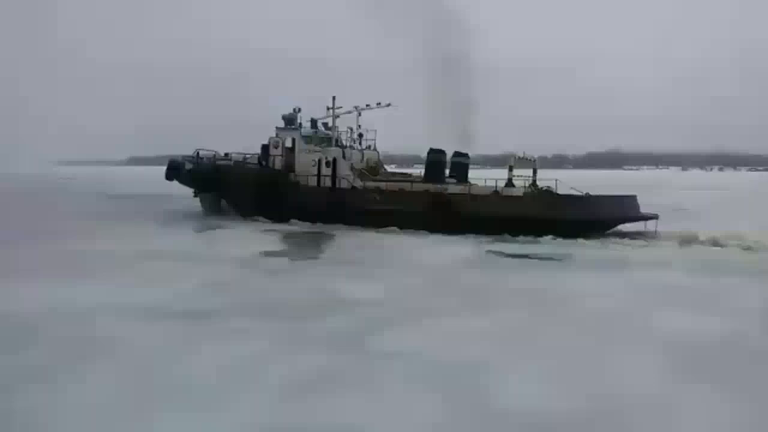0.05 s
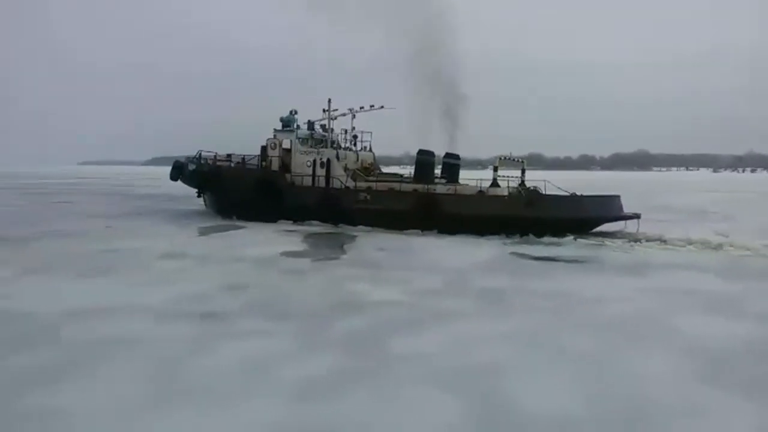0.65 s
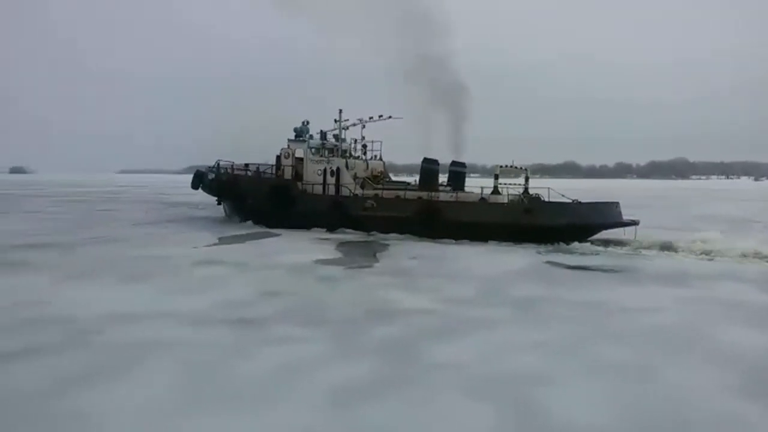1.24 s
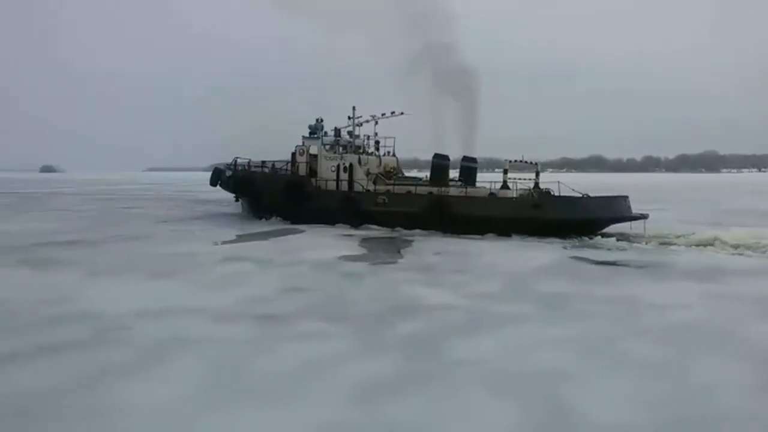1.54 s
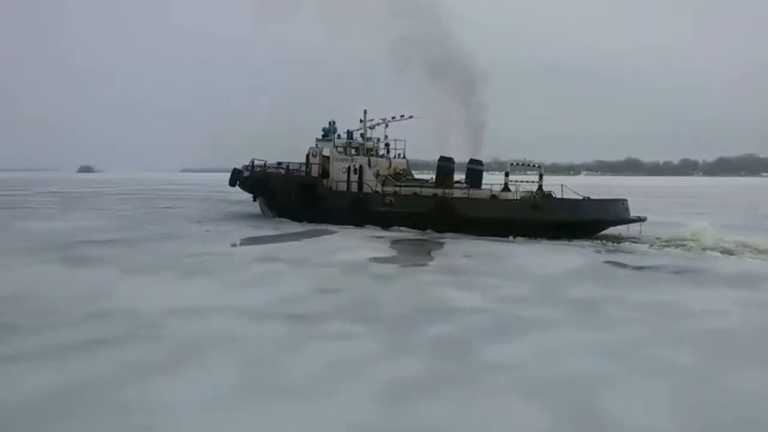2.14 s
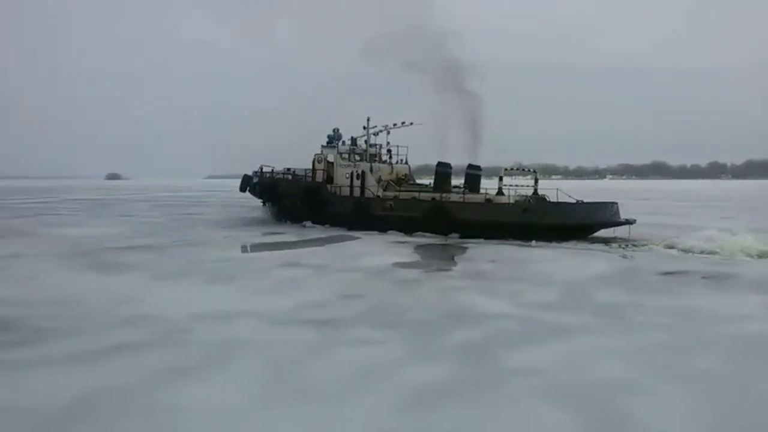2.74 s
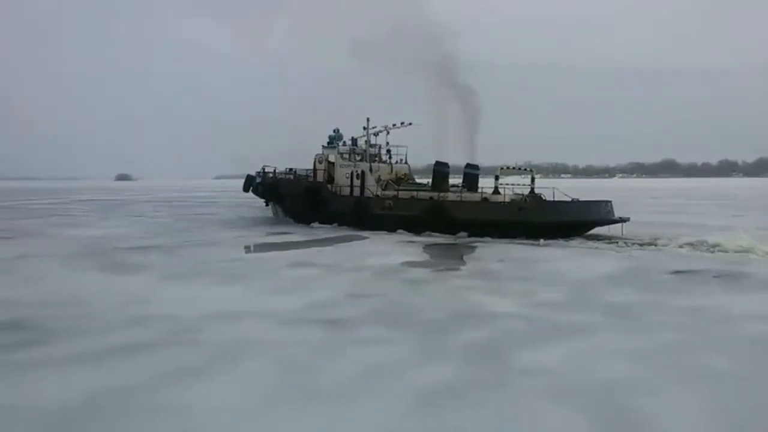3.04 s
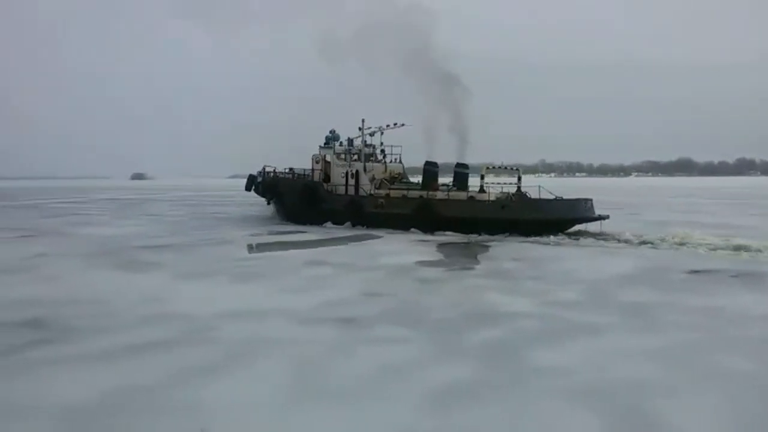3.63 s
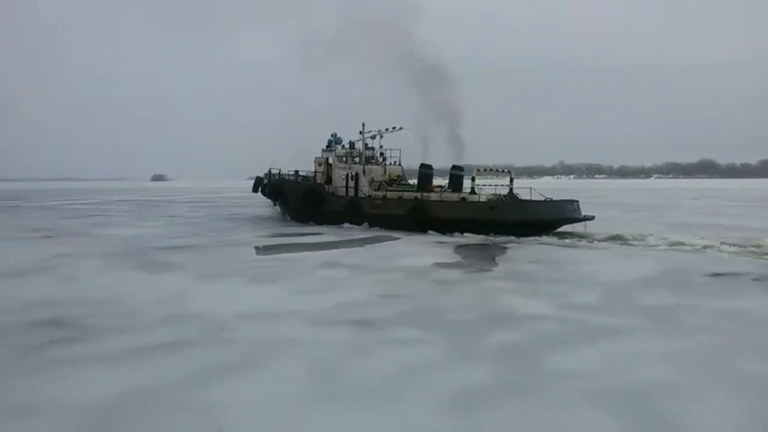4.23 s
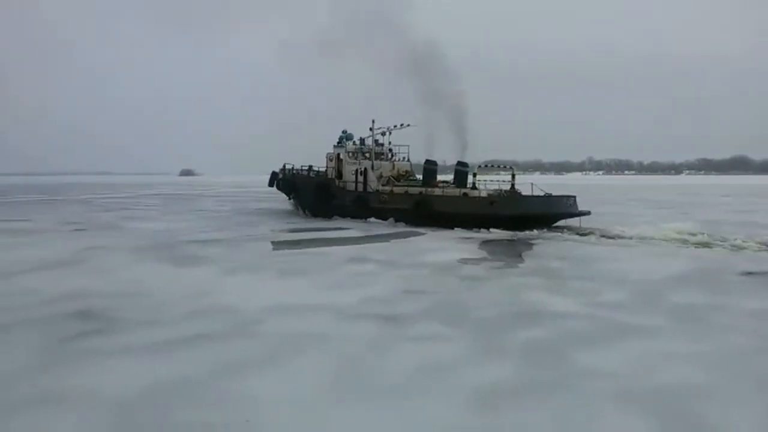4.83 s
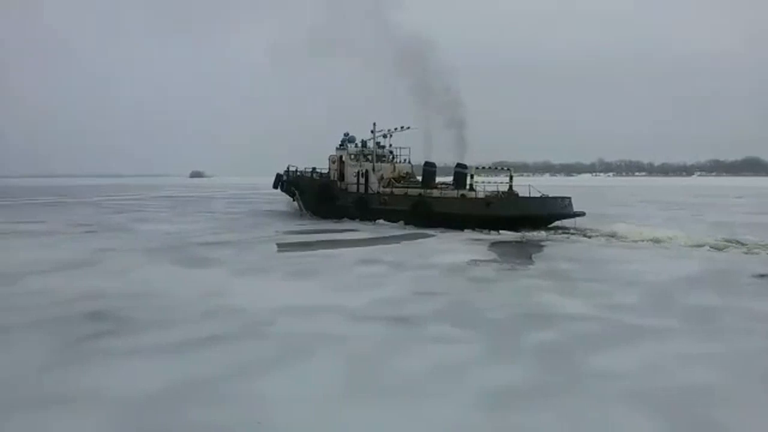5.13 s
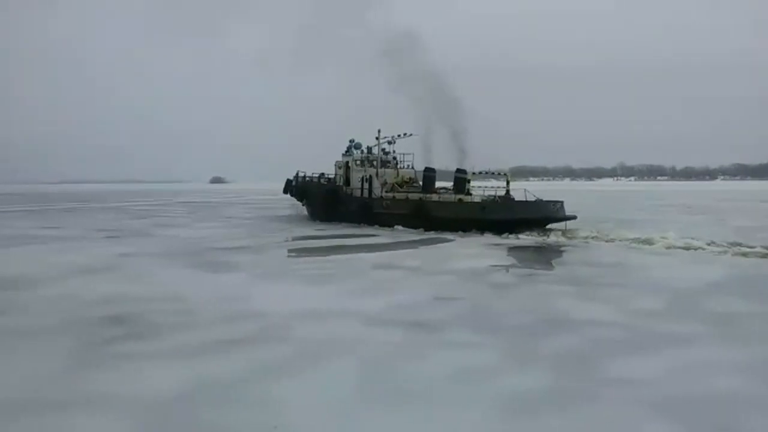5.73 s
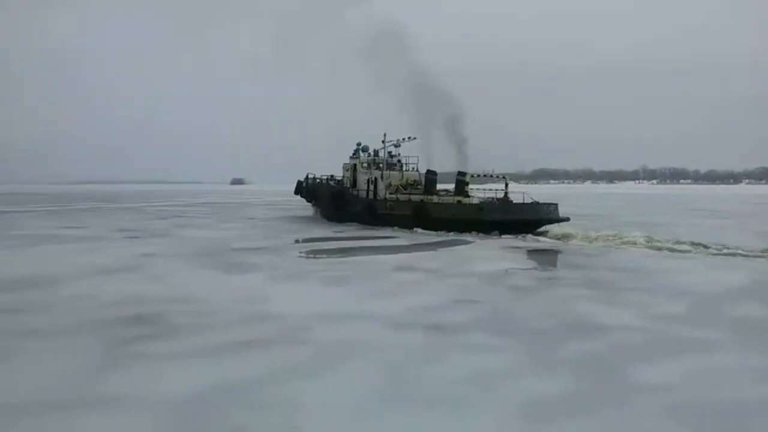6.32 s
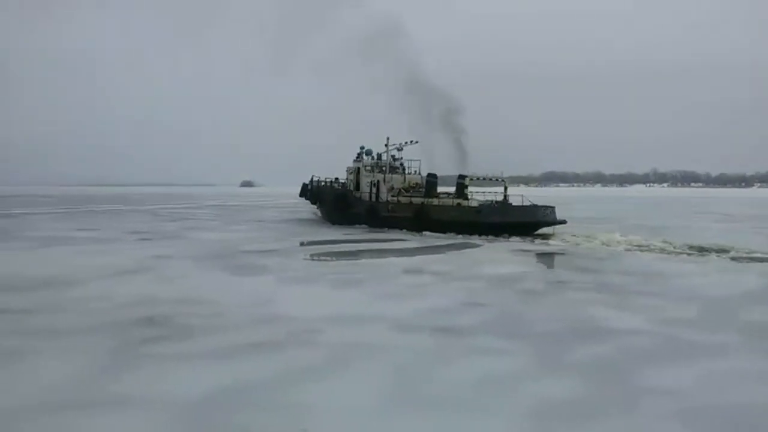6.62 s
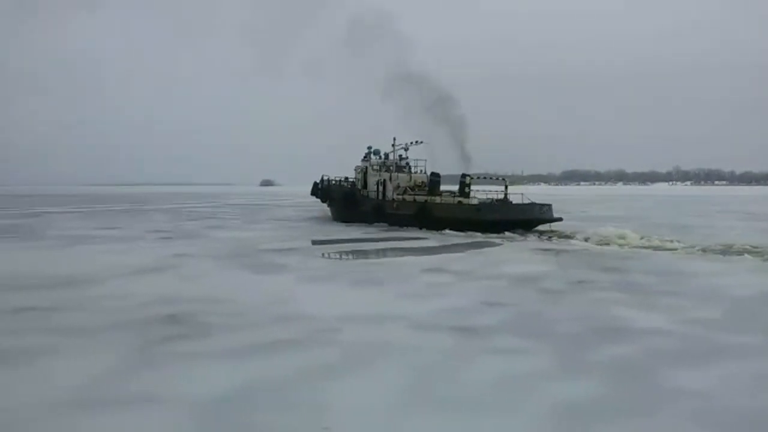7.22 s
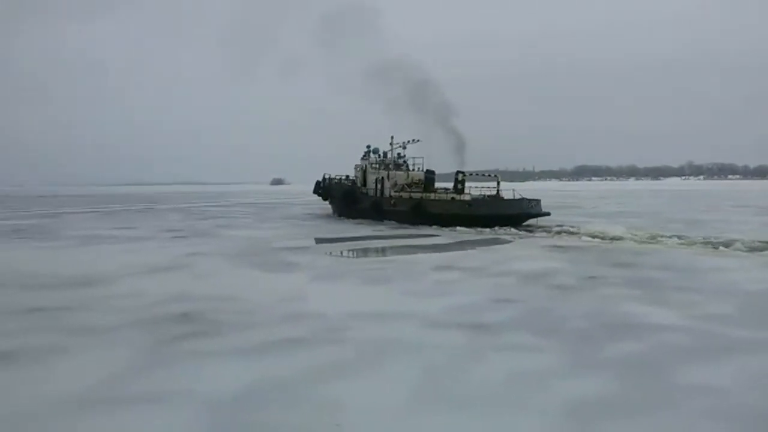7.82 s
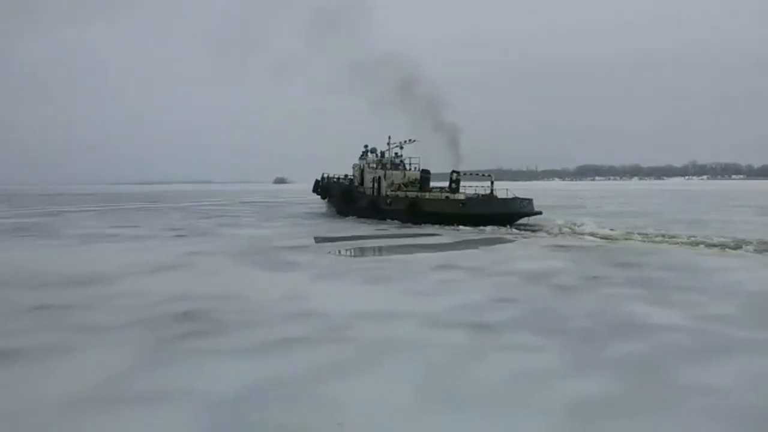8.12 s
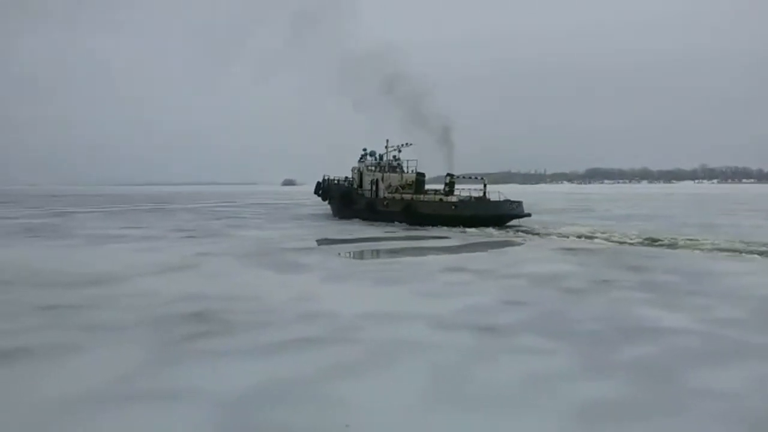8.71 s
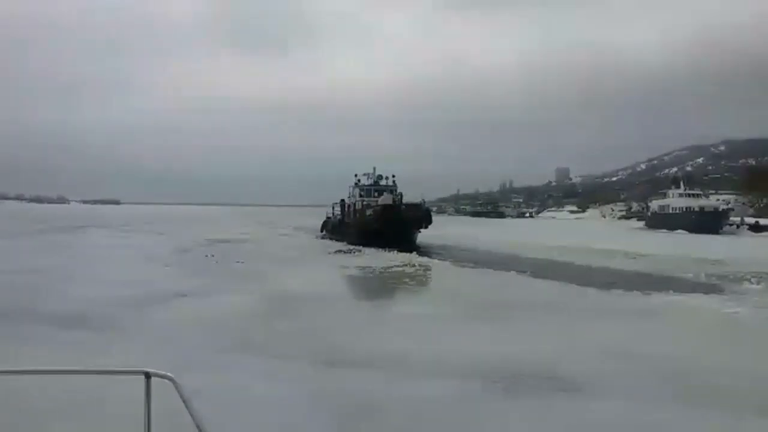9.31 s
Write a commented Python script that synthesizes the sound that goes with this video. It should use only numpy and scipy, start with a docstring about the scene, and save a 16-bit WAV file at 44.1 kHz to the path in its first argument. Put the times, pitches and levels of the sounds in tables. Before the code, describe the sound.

A tugboat's twin diesel engines fade in, throbbing slightly out of step, with a surging exhaust rumble and rattling steelwork. Churned water roars while slush hisses and tinkles along the hull, and plates of ice snap now and then. A faint high whistle comes through midway. Near the end everything cuts off, then briefly returns quieter and duller. It is heard from an open deck on an icy river.

```python
"""A throb of twin diesels fades in, heard from the open deck of a vessel in thin river ice.
Slightly out of step, the engines beat against each other; their puffs ring the exhaust pipes and
rattle the steel deckhouse. Churned water roars, slush hisses and tinkles along the hull, plates of
ice snap and a turbocharger sings faintly. The sound cuts off, then briefly returns quieter and duller."""
import sys
import numpy as np
from scipy import signal
from scipy.fft import rfft, irfft
from scipy.io import wavfile
from scipy.ndimage import uniform_filter1d, minimum_filter1d, map_coordinates

SR = 44100
rng = np.random.default_rng(int(sys.argv[2]) if len(sys.argv) > 2 else 0)


def unload_audio(sound):
    """Save the sound as a 16-bit wav file, at the path given as the first command line argument."""
    columns = np.transpose(np.atleast_2d(sound))
    # keep every value between -1 and 1, then stretch to whole-number steps
    steps = np.round(np.clip(columns, -1, 1) * 32767)
    wavfile.write(sys.argv[1], SR, steps.astype(np.int16))


N = 421596
TIME, BINS = np.arange(N) / SR, np.fft.rfftfreq(N, 1 / SR)


def amp(db):
    """Decibels to gain."""
    return 10 ** (np.asarray(db) / 20)


def unit(x):
    """Scales to rms 1."""
    return x / np.sqrt(np.mean(x ** 2) + 1e-20)


def curve(points):
    """An automation curve through (time, value) points."""
    return np.interp(TIME, *np.transpose(points))


def swells(rows, width_s):
    """Bell-shaped rises and falls, from (time, height) rows."""
    return sum(height * np.exp(-((TIME - s) / width_s) ** 2 / 2) for s, height in rows)


def wander(rate_hz):
    """Slow random modulation of rms 1, up to about rate_hz."""
    lowpass = (BINS > .3) / (1 + (BINS / rate_hz) ** 2)
    return unit(irfft(rfft(rng.standard_normal(N)) * lowpass, N))


def colour(points):
    """An EQ curve through (frequency, level) points."""
    hz, db = np.transpose(points)
    return amp(np.interp(np.log(BINS + 1), np.log(hz + 1), db))


def ringing(modes):
    """The EQ curve of a bank of resonances."""
    powers = (amp(db) ** 2 / (1 + ((BINS - hz) / (0.7 * width)) ** 2) ** 2 for hz, width, db in modes)
    return np.sqrt(sum(powers))


def shaped(drive, gain):
    """Gives a white drive the spectral density gain (per root Hz)."""
    return irfft(rfft(unit(drive)) * gain, N) * np.sqrt(SR / 2)


# firing of the stronger engine, dragged down once by a passing load: (time [s], rate [Hz])
FIRING_RATE = [(0, 36.2), (1.6, 36.15), (2.4, 36.7), (3.2, 36.85), (4.8, 36.6), (5.55, 35.8), (6.7, 36.65),
               (7.6, 36.72), (8.3, 37.2)]
# how much slower the weaker engine fires, which paces the throb: (time [s], rate gap [Hz])
FIRING_SLIP = [(0, 2.04), (.7, 1.78), (1.2, 1.83), (1.7, 1.5), (2.3, 1.9), (2.9, 2.41), (3.5, 2.6),
               (4.1, 2.3), (4.7, 2.31), (5.2, 2.77), (5.7, 2.62), (6.2, 1.49), (6.7, 2.16), (7.3, 2.38),
               (8.0, 2.3), (8.5, 3.05), (9.0, 2.85)]

def firing_cycles():
    """Running count of each engine's firings: both creep up and sag together, the weaker one lagging."""
    strong_hz = curve(FIRING_RATE)
    weak_hz = strong_hz - curve(FIRING_SLIP)
    return np.cumsum(strong_hz) / SR, np.cumsum(weak_hz) / SR


# exhaust tones of the stronger engine: (multiple of the firing rate, level [dB])
ENGINE_TONES = [(1, -27.5), (2, -15.5), (3, -32), (4, -30.5), (5, -28.5)]
# the weaker engine against those, tone by tone: (trim [dB])
WEAKER_TRIM = [1, -5.5, -0.5, -2.5, -6]

def engine(cycles, trim_db, waver_db=1.0, recede_db_per_s=0.24):
    """One diesel's low tones sway with the load and weaken as the vessel draws away."""
    tones = sum(amp(db + trim) * np.cos(2 * np.pi * harmonic * cycles)
                for (harmonic, db), trim in zip(ENGINE_TONES, trim_db))
    return np.sqrt(2) * tones * amp(waver_db * wander(3) - recede_db_per_s * TIME)


def puffs(firings, depth):
    """Turbulent gas, pulsing at twice each engine's firing rate."""
    pulse = sum(np.cos(4 * np.pi * cycles) for cycles in firings) / 2
    return np.exp(depth * pulse) * rng.standard_normal(N)


# exhaust pipe resonances: (frequency [Hz], width [Hz], level [dB])
PIPE_MODES = [(91, 42, -36), (153, 34.2, -39), (180, 38, -37.5), (268, 31, -40.5), (313.6, 67.3, -41.5)]
# fader ride on the rumble: (time [s], level [dB])
RUMBLE_RIDE = [(.6, 0), (1.2, 0.5), (1.7, -2), (2.2, -2), (2.6, 0), (3.6, 0), (4.1, -0.1), (4.8, -1),
               (5.2, 0.3), (5.8, 0.3), (6.4, -1), (7.1, 0.5), (7.35, -0.2), (7.7, .5), (8.5, -2.1),
               (9, 1.5)]

def exhaust(firings, puff_depth=0.12, surge_db=1.25):
    """The puffs ring the exhaust pipes: a rumble that surges unevenly."""
    low_cut = 1 / np.sqrt(1 + (55 / (BINS + 1)) ** 8)  # an open pipe radiates little deep bass
    rumble = shaped(puffs(firings, puff_depth), ringing(PIPE_MODES) * low_cut)
    return rumble * amp(curve(RUMBLE_RIDE) + surge_db * wander(21))


# steel deckhouse resonances: (frequency [Hz], width [Hz], level [dB])
DECKHOUSE_MODES = [(517.8, 21, -47.5), (571, 35, -55.5), (697, 70, -54.5), (777, 83, -53), (833, 47, -52.5),
                   (1085, 118, -60), (1345, 102, -59), (2183, 110, -66), (2935, 240, -67)]
# fader ride on the clatter: (time [s], level [dB])
CLATTER_RIDE = [(0.75, 1.5), (1.5, -1), (2.4, 1.5), (3.1, 0.5), (5.4, 1.5), (6.5, -0.6), (7.0, 0.2),
                (8.0, 0), (9.0, -0.5)]

def clatter(firings, puff_depth=0.25, chug_db=1.5, chug_hz=20, drift_share=0.00801):
    """The steelwork rattles in uneven chugs, its resonances drifting a little."""
    steel = shaped(puffs(firings, puff_depth), ringing(DECKHOUSE_MODES))
    speed = 1 + drift_share * wander(2.96)
    drifting = map_coordinates(steel, [np.cumsum(speed)], order=3, mode="wrap")
    return drifting * amp(curve(CLATTER_RIDE) + chug_db * wander(chug_hz))


# bass-heavy roar of the water: (frequency [Hz], level [dB])
WASH_EQ = [(15, -65.5), (38, -57.5), (52, -44.5), (120, -40.5), (225, -57), (400, -54.5), (650, -61),
           (950, -63.5), (1450, -66), (2500, -70.5), (5000, -63.5), (10000, -107.5)]

def wash(swell_db=1.7):
    """Churned water roars and swells gently."""
    return shaped(rng.standard_normal(N), colour(WASH_EQ)) * amp(swell_db * wander(3.8))


def splinters(shards_per_s=2400, spread_db=2.0, ring_s=0.0021, pitches=30):
    """Countless splinters of ice, each ringing for an instant at a random time and strength."""
    t = np.arange(1024) / SR
    tinkle = np.zeros(N)
    for hz in np.linspace(1500, 11000, pitches):
        struck = rng.random(N) < shards_per_s / pitches / SR
        strength = amp(spread_db * np.minimum(rng.standard_exponential(N), 5))
        ping = np.exp(-t / ring_s) * np.sin(2 * np.pi * hz * t)
        tinkle += signal.oaconvolve(struck * strength, ping)[:N]
    return tinkle - tinkle.mean()


# bright hiss of ice along the hull: (frequency [Hz], level [dB])
SLUSH_EQ = [(800, -101.5), (1800, -67.5), (2600, -70.5), (3300, -69), (3650, -62.5), (4250, -62),
            (4600, -59), (5100, -59), (5800, -61), (6300, -65.5), (7300, -70.5), (8900, -74),
            (10200, -80.5), (11500, -99.5)]
# brief surges of the slush: (time [s], boost [dB])
SLUSH_SURGES = [(1.2, 2), (6.04, 3), (6.38, 2.5), (7.52, 3), (7.82, 1.5)]

def slush(tinkle_share=0.23, clump_db=0.96, hold_db=0.4, ease_from_s=5.45, ease_db_per_s=1.02):
    """Splinters tinkle over a fizz of spray, in clumps as the ice gives way; the level holds, then eases."""
    tinkle = unit(shaped(splinters(), colour(SLUSH_EQ)))
    spray = shaped(rng.standard_normal(N), colour(SLUSH_EQ))
    blend = np.sqrt(1 - tinkle_share) * spray + np.sqrt(tinkle_share) * spray.std() * tinkle
    ride_db = hold_db - ease_db_per_s * np.maximum(TIME - ease_from_s, 0)
    return blend * amp(ride_db + swells(SLUSH_SURGES, width_s=0.031) + clump_db * wander(15))


def tone_swell(s, hz, db, width_s):
    """One tone swells and dies back."""
    return np.sqrt(2) * swells([(s, amp(db))], width_s) * np.sin(2 * np.pi * (hz * TIME + rng.random()))


# low accents in the rumble: (time [s], pitch [Hz], level [dB], swell width [s])
RUMBLE_SWELLS = [(0.686, 288, -18.5, 0.03), (0.896, 174.3, -9.5, 0.028), (1.145, 284.6, -21, 0.025),
                 (1.2, 159, -19, 0.045), (2.547, 174, -14, 0.039), (2.864, 184.2, -15, 0.028),
                 (3.52, 172.6, -18, 0.033), (3.722, 150, -15, 0.026), (5.654, 113, -16, 0.035),
                 (6.67, 168.7, -14.5, 0.055), (6.824, 264.5, -21.5, 0.11), (7.18, 261.6, -20.5, 0.036),
                 (7.59, 304, -21, 0.037), (8.207, 140, -14, 0.04), (8.216, 269, -18, 0.042),
                 (8.767, 255, -17, 0.026), (8.81, 312, -19, 0.035)]

def rumble_swells():
    """Brief low swells in the rumble, with one strong boom near 0.9 s."""
    return sum(tone_swell(*swell) for swell in RUMBLE_SWELLS)


# metallic accents above the clatter: (time [s], pitch [Hz], level [dB])
PANEL_RINGS = [(.75, 780, -28), (2.37, 827, -30.5), (2.41, 759, -30), (3.63, 802, -28), (4.05, 836, -31),
               (4.39, 834, -31.5), (4.71, 829, -30), (4.99, 807, -30), (5.43, 796, -30), (6.92, 792, -31)]

def steel_rings():
    """A steel panel is shaken into ringing for a moment."""
    return sum(tone_swell(*ring, width_s=0.028) for ring in PANEL_RINGS)


# sharp cracks of ice: (time [s], level [dB])
ICE_SNAPS = [(2.122, -16.5), (2.316, -17), (3.726, -11.5), (4.394, -14), (5.274, -13), (6.115, -10.5),
             (7.472, -20), (7.783, -12)]

def snaps(decay_s=0.0042):
    """Larger plates break, each a short burst in the colour of the slush."""
    bursts = sum(amp(db) * (TIME >= s) * np.exp(-abs(TIME - s) / decay_s) for s, db in ICE_SNAPS)
    return bursts * unit(shaped(rng.standard_normal(N), colour(SLUSH_EQ))) / 2


# blade tone of the turbocharger: (time [s], pitch [Hz])
BLADE_PITCH = [(.5, 4112), (2.5, 4132), (4.5, 4098), (5.4, 4103), (6.4, 4144), (8, 4175)]
# fader ride on the whistle, which twice comes through the hiss: (time [s], level [dB])
WHISTLE_RIDE = [(3.9, -46), (4.2, -41), (4.48, -43.5), (4.57, -31.5), (4.72, -37.5), (4.9, -35),
                (5.07, -36.5), (5.17, -47), (5.35, -40), (5.55, -47), (5.8, -38), (6.1, -35), (6.42, -34),
                (6.55, -42), (6.9, -42.5), (7.2, -47)]

def turbo(jitter_hz=2, flutter_db=0.9, octave_db=-56.5):
    """Spinning blades sing a thin whistle and its octave, fluttering in the moving air."""
    phase = 2 * np.pi * np.cumsum(curve(BLADE_PITCH) + jitter_hz * wander(12)) / SR
    whistle = amp(curve(WHISTLE_RIDE)) * np.sin(phase)
    octave = amp(octave_db) * np.sin(2 * phase)
    return np.sqrt(2) * amp(flutter_db * wander(7.4)) * (whistle + octave)


# modes of one hard piece of ice: (frequency [Hz], level [dB], time to fall 60 dB [s])
CHINK_MODES = [(5615, -22.5, .05), (5950, -19, .05), (6480, -23, .023)]

def chink(strike_s=6.114):
    """A hard piece of ice is struck and rings like glass."""
    age = np.maximum(TIME - strike_s, 0)
    return sum(amp(db - 60 * np.minimum(age / t60, 3)) * np.sin(2 * np.pi * hz * age)
               for hz, db, t60 in CHINK_MODES)


def fade_in(start_s, length_s, first_step):
    """A small step out of silence, then a straight ramp toward full level."""
    return np.clip(first_step + (TIME - start_s) / length_s, 0, 1) * (TIME >= start_s)


# EQ of the quieter, duller ending: (frequency [Hz], gain [dB])
ENDING_EQ = [(70, -13.5), (180, -11), (330, -8), (600, -4), (800, -10), (1900, -3.5), (3000, -10),
             (5000, -17), (8000, -23.5)]

def scene(cut_s=9.0, cut_length_s=0.002):
    """Engines and ice fade in, cut to silence, and start to fade back in, muffled."""
    strong, weak = firings = firing_cycles()
    throb = engine(strong, np.zeros(len(ENGINE_TONES))) + engine(weak, WEAKER_TRIM)
    machinery = throb + exhaust(firings) + rumble_swells() + clatter(firings) + steel_rings() + turbo()
    deck = machinery + wash() + slush() + snaps() + chink()
    gate = np.clip((cut_s - TIME) / cut_length_s + 0.5, 0, 1)
    passage = deck * fade_in(start_s=0.407, length_s=0.3, first_step=0.023) * gate
    muffled = irfft(rfft(deck) * colour(ENDING_EQ), N)
    ending = muffled * fade_in(start_s=9.346, length_s=0.28, first_step=0.017)
    return (passage + ending)[None]


def record(dry, ceiling=0.95, window=256, cutoff_hz=11300):
    """A fast limiter holds down the tallest peaks; a steep low-pass trims the top."""
    allowed = np.minimum(1, ceiling / (abs(dry) + 1e-9))
    limited = dry * uniform_filter1d(minimum_filter1d(allowed, window), window)
    lowpass = signal.firwin(511, cutoff_hz, window=("kaiser", 9), fs=SR)
    return signal.oaconvolve(limited, lowpass[None], "same")


dry = scene()
out = record(dry)
unload_audio(out)
```